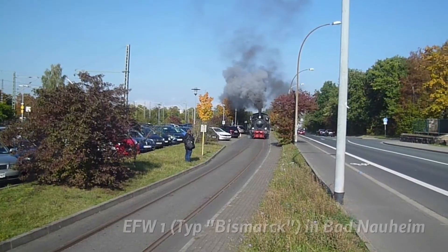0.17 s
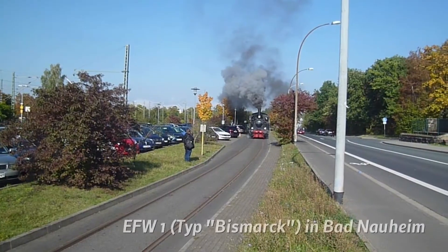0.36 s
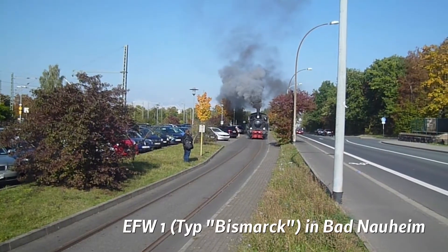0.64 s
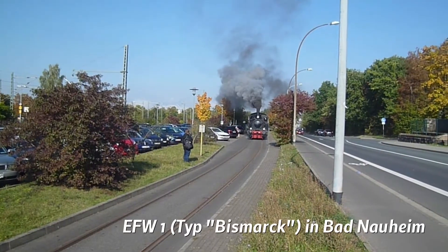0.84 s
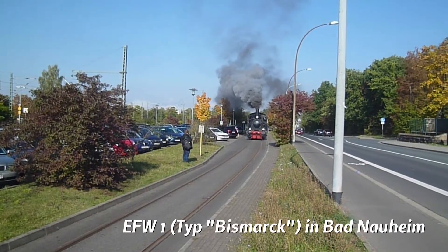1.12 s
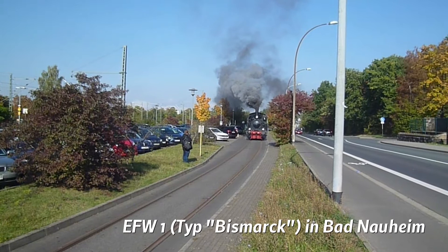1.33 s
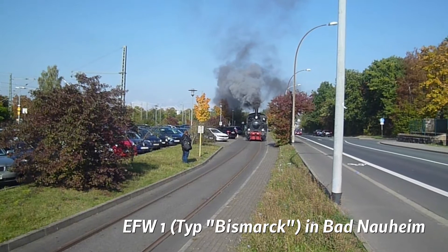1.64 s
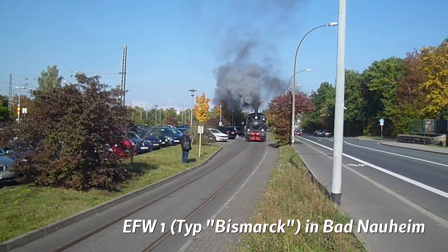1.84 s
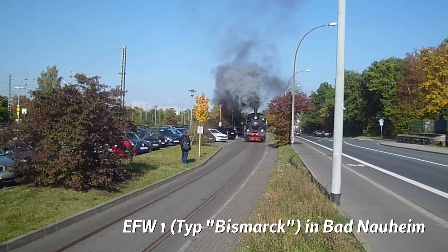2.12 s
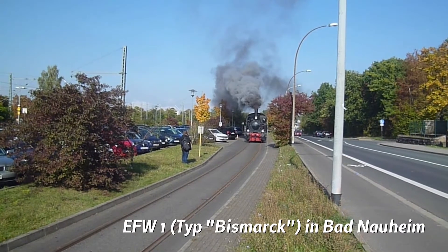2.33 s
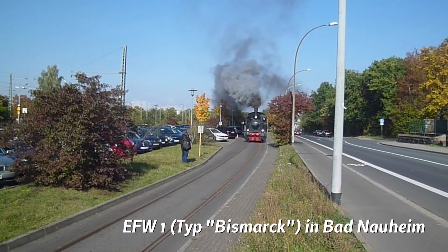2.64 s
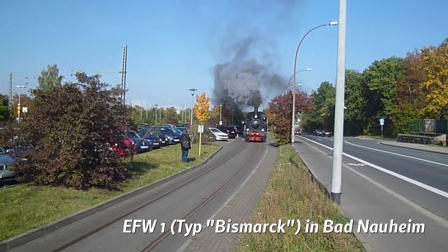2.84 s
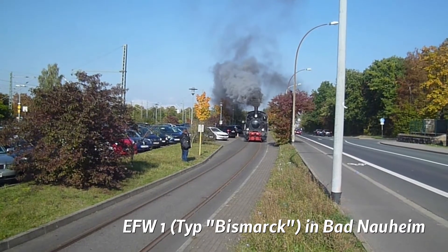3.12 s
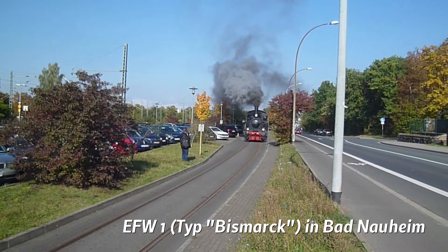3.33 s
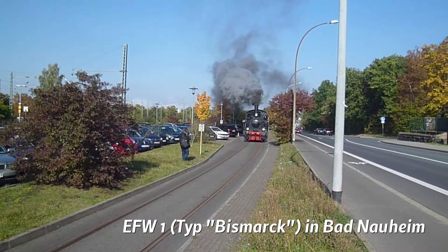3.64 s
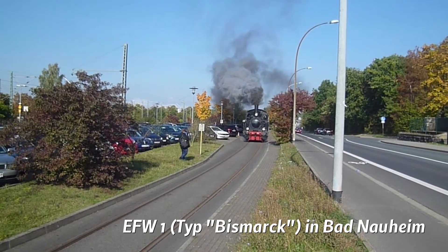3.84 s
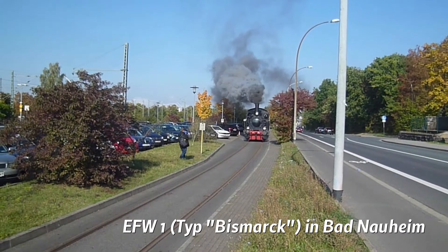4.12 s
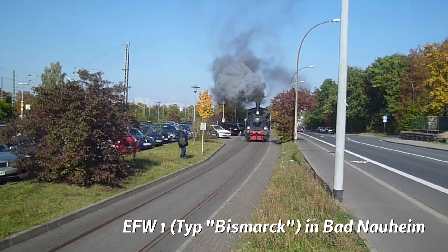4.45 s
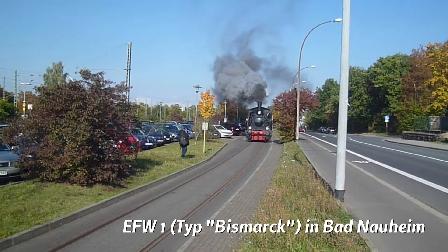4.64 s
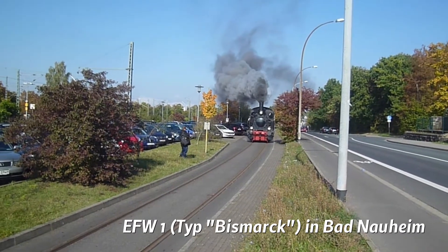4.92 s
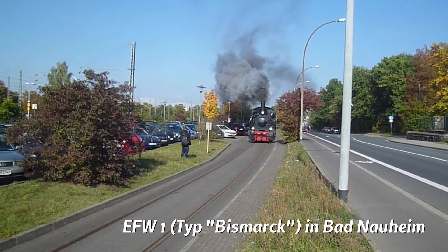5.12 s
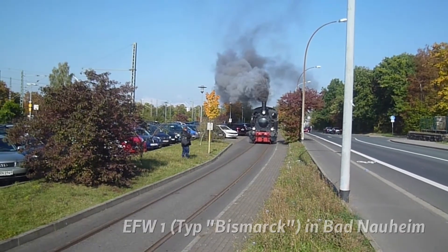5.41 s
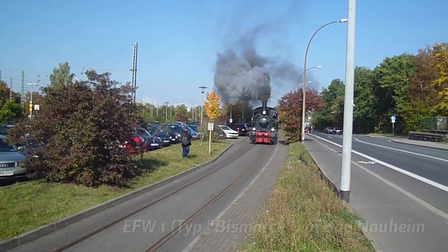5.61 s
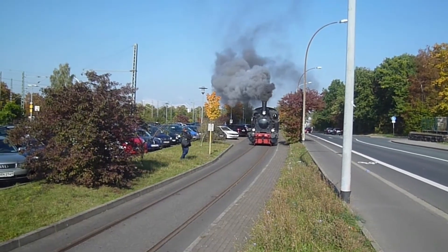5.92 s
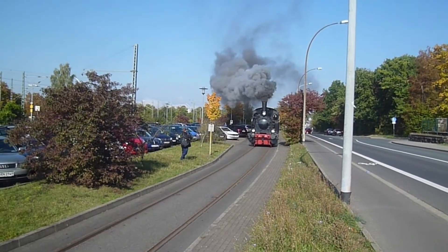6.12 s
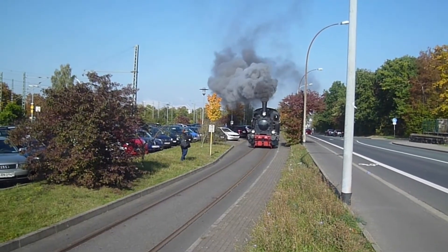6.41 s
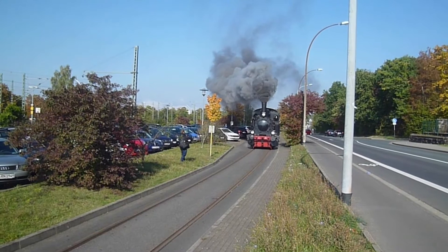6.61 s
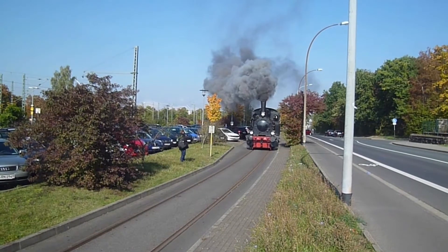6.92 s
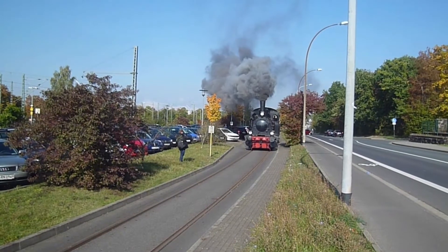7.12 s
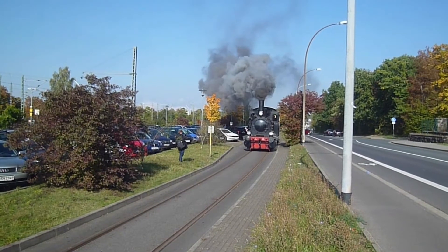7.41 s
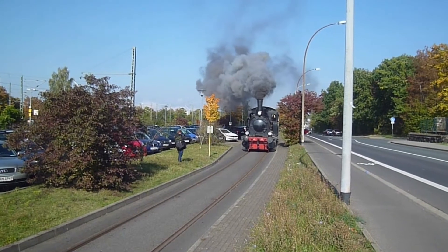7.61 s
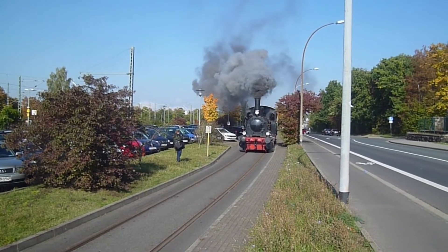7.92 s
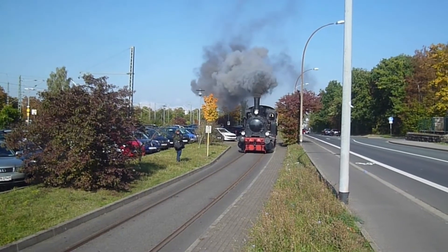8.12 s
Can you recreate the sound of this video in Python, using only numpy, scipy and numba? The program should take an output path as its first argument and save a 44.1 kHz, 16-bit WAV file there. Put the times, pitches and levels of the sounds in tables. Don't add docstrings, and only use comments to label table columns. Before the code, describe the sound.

Open street, mono camera microphone with dull treble and automatic gain. From 0 to 2.7 s a distant steam locomotive approaches with regular chuffs, about four a second: each a short hiss with a hollow chimney ring and a soft lower thump. Low traffic rumble, road noise and faint leaking steam lie beneath. At 2.8 s a brief squeal opens a very loud, nearly pure whistle around 740 Hz, starting slightly flat and rising, with breathy steam and small flutters; the background drops away. At 4.3 s it cuts off, and a strong echo at the same pitch pulses and fades over a second or more while the background climbs back. Chuffs re-emerge at 4.9 s, continuing to 8.3 s and slowly nearing. Wind thumps the microphone, heaviest at 5.5 to 5.8 s; a faint falling chirp comes at 5.7 s. Small metallic clanks sound near 6.9, 7.5 and 7.8 s.

```python
import sys
import numpy as np
from scipy import signal
from scipy.fft import rfft, irfft, next_fast_len
from scipy.io import wavfile
from scipy.ndimage import uniform_filter1d
from numba import njit

SR = 44100
rng = np.random.default_rng(int(sys.argv[2]) if len(sys.argv) > 2 else 0)


def convert_level_to_amplitude(level_db):
    exponent = np.asarray(level_db, float) / 20
    return 10 ** exponent


def transcribe(signal):
    frames = np.atleast_2d(signal).T
    limited = np.clip(frames, -1, 1)
    pcm = np.round(limited * 32767).astype(np.int16)
    wavfile.write(sys.argv[1], SR, pcm)


N = 364266
TIME = np.arange(N) / SR


def rms1(x):
    return x / np.sqrt(np.mean(x ** 2))


@njit
def svf(x, hz, width):
    y, band, low = np.empty(len(x)), 0., 0.
    g, k = np.tan(np.pi * hz / SR), width / hz
    for i in range(len(x)):
        v = (band + g * (x[i] - low)) / (1 + g * (g + k))
        band, low, y[i] = 2 * v - band, low + 2 * g * v, k * v
    return y


def walk(rate_hz):
    knots = rng.standard_normal(2000)
    place = TIME * rate_hz
    step = place.astype(int)
    blend = np.sin(np.pi / 2 * (place - step)) ** 2
    return 1.15 * (knots[step % 2000] * (1 - blend) + knots[(step + 1) % 2000] * blend)


def resonant(modes):
    out = np.zeros(N)
    for hz, width_hz, db in modes:
        once = svf(rng.standard_normal(N), 1. * hz, 1.46 * width_hz)
        out += convert_level_to_amplitude(db) * rms1(svf(once, 1. * hz, 1.46 * width_hz))
    return rms1(out)


def coloured(shape, flicker_db, rate_hz):
    hz, db = np.transpose(shape)
    size = next_fast_len(N, real=True)
    octave = np.log2(np.maximum(np.fft.rfftfreq(size, 1 / SR), 1) / hz[0])
    level = convert_level_to_amplitude(np.interp(octave, np.log2(hz / hz[0]), db, right=-200))
    spectrum = rfft(rng.standard_normal(size)) * level
    out = np.zeros(N)
    for k in range(int(np.log2(hz[-1] / hz[0])) + 2):
        band = irfft(spectrum * np.clip(1 - abs(octave - k), 0, 1), size)[:N]
        out += band * convert_level_to_amplitude(flicker_db * walk(rate_hz))
    return rms1(out)


def puffs(starts, dbs, rise, fall):
    age = np.arange(SR // 2) / SR
    shape = (1 - np.exp(-age / rise)) ** 2 * np.exp(-age / fall)
    kicks = np.zeros(N + SR)
    kicks[((np.asarray(starts) + 1) * SR).astype(int)] = convert_level_to_amplitude(np.asarray(dbs))
    return signal.fftconvolve(kicks, shape / shape.max())[SR:N + SR]


def curve(table):
    return np.interp(TIME, *np.transpose(table))


def bump(at, spread_s):
    return np.exp(-.5 * ((TIME - at) / spread_s) ** 2)


def swells(table, phase, fill):
    s, db = np.transpose(table)
    place = np.interp(TIME, s, np.arange(len(s)))
    size = uniform_filter1d(convert_level_to_amplitude(db[place.astype(int)]) * (TIME < s[-1]), SR // 60)
    return size * (np.sin(np.pi * place) * np.sin(phase) + fill * np.cos(phase))


DUCK_S, RELEASE_S = 2.795, 4.424
DUCK_DB, SINK_DB_S, RECOVER_DB_S = -13.5, -3, 10


def gain_db():
    sunk = DUCK_DB + SINK_DB_S * (np.minimum(TIME, RELEASE_S) - DUCK_S)
    return (TIME >= DUCK_S) * np.minimum(sunk + RECOVER_DB_S * np.maximum(TIME - RELEASE_S, 0), 0)


START_M, SPEED_M_S = 61.2, 2.98


def nearer_db():
    return 20 * np.log10(START_M / (START_M - SPEED_M_S * TIME))


# (time [s], strength [dB], brightness [dB])
CHUFFS = [(-.012, 0, -4), (0.227, 1, 0), (0.475, 2, -0.5), (0.7256, -0.5, 1.5), (0.981, 2.5, 0),
          (1.2284, 1, 0.5), (1.4684, 2, 1), (1.725, 0, -0.5), (1.969, 3, -0.5), (2.2164, 1.5, 0),
          (2.451, 1.5, 0), (2.691, -0.5, -2), (4.8534, -2, -2.5), (5.0804, -1.5, 0), (5.3174, 1, 0.5),
          (5.5434, -0.5, -1.5), (5.7894, 1, 0), (6.0194, 0.5, -1.5), (6.244, -0.5, 0.5),
          (6.4784, -0.5, -2.5), (6.7095, 0.5, -1), (6.94, 0, -1), (7.163, 0, 0.5), (7.39, -1.5, -2),
          (7.6264, 1.5, -1), (7.855, -0.5, -3), (8.0775, 0, 0.5)]
# (centre [Hz], width [Hz], level [dB])
HISS = [(2567, 180, 0.5), (3457, 1100, 3), (4510, 190, -11), (5170, 440, -2), (6300, 1400, -3.5)]
RING = [(1392, 90, -5), (1914, 79, -4), (2060, 90, -4), (1500, 900, -6)]
THUMP = [(589.5, 110, 0.5), (732, 130, -1), (900, 610, -5.5)]
# (time [s], level [dB], decay [s])
CLANKS = [
    (1.648, -41, .02),
    (6.887, -34, 0.055),
    (7.539, -33, .03),
    (7.811, -34.5, 0.035),
]
HISS_DB, RING_DB, THUMP_DB = -41, -39, -39.5


def chuffs():
    s, db, bright_db = np.transpose(CHUFFS)
    s = s - .005
    near_db = nearer_db()
    hiss = puffs(s, HISS_DB + db + bright_db, rise=.012, fall=.031)
    hiss = hiss * convert_level_to_amplitude(2 * walk(200) - .17 * near_db) * resonant(HISS)
    ring = puffs(s, RING_DB + db, rise=.01, fall=.044)
    ring = ring * convert_level_to_amplitude(2 * walk(150) - .34 * near_db) * resonant(RING)
    thump = puffs(s + .004, THUMP_DB + db - bright_db, rise=.018, fall=.049)
    thump = thump * convert_level_to_amplitude(.79 * near_db) * resonant(THUMP)
    beats = convert_level_to_amplitude(.67 * gain_db() + .6 * near_db) * (hiss + ring + thump)
    clank = sum(puffs([at], [level], rise=.0033, fall=decay) for at, level, decay in CLANKS)
    metal = resonant([(770, 140, 5.5), (1985, 350, 0.), (2530, 200, -6.5), (5000, 3000, -10.5)])
    return beats + clank * metal


# (frequency [Hz], density [dB per Hz])
RUMBLE = [(22, -21), (50, -8), (90, -4.5), (120, -0.5), (200, -1.5), (320, -3.5), (380, -14.5),
          (600, -29.5)]
ROAD = [(300, -10), (400, 0), (720, 1), (1100, -5.5), (2000, -8), (2300, -11.5), (2650, -5.5),
        (3100, -19.5)]
STEAM = [(2400, -9.5), (2950, -2), (3300, 1), (3750, -4.5), (5100, -6.5), (5800, -1.5), (6500, -9),
         (8000, -16.5)]
# (time [s], level [dB])
GUST = [(0, -1), (.9, 0), (1.4, 2.5), (2.1, 0), (3.1, 0.5), (3.85, -4), (4.35, 1), (4.7, 6.5), (5.2, 2.5),
        (5.45, 10), (6.1, 0.5), (6.4, 3), (6.75, 2), (7.4, 5), (7.65, 2), (8.26, 5)]
# (frequency [Hz], level [dB])
MOTOR = [(595, -51.5), (1565, -59.5)]
RUMBLE_DB, ROAD_DB, STEAM_DB, ROAD_DUCK = -32.5, -41.5, -51.5, .76


def street():
    gain, near_db = gain_db(), nearer_db()
    rumble = convert_level_to_amplitude(RUMBLE_DB + curve(GUST) + gain) * coloured(RUMBLE, flicker_db=1.8, rate_hz=16)
    road_db = ROAD_DB + ROAD_DUCK * gain + .98 * near_db
    road = convert_level_to_amplitude(road_db) * coloured(ROAD, flicker_db=1.2, rate_hz=14)
    steam_db = STEAM_DB + .7 * gain + 1.38 * near_db
    steam = convert_level_to_amplitude(steam_db) * coloured(STEAM, flicker_db=1.2, rate_hz=21)
    motor = sum(convert_level_to_amplitude(db + 5.4 * walk(6)) * np.sin(2 * np.pi * hz * TIME) for hz, db in MOTOR)
    return rumble + road + steam + convert_level_to_amplitude(gain) * motor


# (time [s], peak [dB], frequency [Hz])
KNOCKS = [(0.029, -21, 135), (4.483, -29, 121), (4.722, -23, 140), (4.788, -31, 231), (4.904, -22, 194),
          (5.142, -25.5, 143), (5.324, -20.5, 135), (5.509, -12, 148), (5.557, -17, 194), (5.608, -29, 223),
          (5.713, -13, 164), (5.828, -10, 196), (5.904, -30, 175), (6.301, -21, 218), (6.385, -20, 143),
          (7.344, -14, 170)]


def wind():
    out, age = np.zeros(N), np.arange(SR // 20) / SR
    for at, db, hz in KNOCKS:
        cycles = (age - .008) * hz * 1.16
        knock = np.exp(-(cycles / .5) ** 2) * np.cos(2 * np.pi * cycles + .84)
        out[int(at * SR):][:len(age)] -= convert_level_to_amplitude(db + .9) * knock
    return out


# (frequency [Hz], peak [dB], time [s], spread [s])
SQUEAL = [
    (1900, -7, 2.7945, .0018),
    (1880, -15, 2.799, .002),
    (800, -20, 2.795, .002),
    (6100, -28, 2.793, .0015),
]
# (time [s], level [dB])
FLOW = [
    (2.8, 0.5),
    (2.93, 6.5),
    (3.05, -1.5),
    (3.15, 7),
    (3.28, 5),
    (3.43, -1),
    (3.56, 3.5),
    (3.8, -4),
    (4.27, -1.5),
]
# (time [s], depth [dB], spread [s])
DIPS = [
    (3.12, -3, 0.0062),
    (3.265, -0.5, .012),
    (3.605, -4.5, .011),
    (3.815, -4, 0.014),
    (4.02, -4, .045),
    (4.17, -2, .025),
    (4.23, -5.5, 0.011),
]
# (null time [s], next swell peak [dB])
SECOND = [
    (2.77, -28.5),
    (3.056, -27.5),
    (3.33, -29),
    (3.674, -34.5),
    (3.97, -31.5),
    (4.45, -31),
]
# (multiple, level [dB])
UPPER = [(4, -48.5), (5, -52), (6, -55)]
# (centre [Hz], width [Hz], level [dB])
BREATH = [(725, 180, 7.5), (860, 51, 3.5), (1250, 290, 4.5), (2034, 150, 8.5), (2760, 480, 1.5),
          (3500, 400, -2.5), (4300, 500, -1.5), (5800, 3700, 0)]
OPEN_S, SHUT_S = 2.792, 4.318
PITCH_HZ, FLAT_HZ, WARM_S, SAG_HZ = 741.8, 24, .5, 2.3
TONE_DB, THIRD_DB, BREATH_DB, JET_DB = -11, -39.5, -39, -50
LIFT = 1
BEND_HZ_PER_DB = 1


def whistle():
    flat_hz = FLAT_HZ * np.exp(-np.maximum(TIME - OPEN_S, 0) / WARM_S)
    hz = PITCH_HZ - flat_hz - SAG_HZ * np.clip((TIME - SHUT_S) / .24 + 1, 0, 1)
    dip_db = sum(db * bump(at, spread) for at, db, spread in DIPS)
    flow_db = curve(FLOW) - LIFT * dip_db
    phase = 2 * np.pi * np.cumsum(hz + 2 * walk(50)) / SR
    bend = -2 * np.pi * np.cumsum(BEND_HZ_PER_DB * dip_db) / SR

    tone = convert_level_to_amplitude(TONE_DB + dip_db + .25 * walk(60)) * np.sin(phase + bend)
    tone = tone + swells(SECOND, 2 * phase, fill=.15) * convert_level_to_amplitude(2 * walk(25))
    tone = tone + convert_level_to_amplitude(THIRD_DB + flow_db + 3.8 * walk(65)) * np.sin(3 * phase + .5 * walk(70))
    for k, db in UPPER:
        level = convert_level_to_amplitude(db + .4 * flow_db + 1 + 3 * walk(60))
        tone = tone + level * np.sin(k * phase + .5 * walk(60))
    valve = np.clip((TIME - OPEN_S) / .0088, 0, 1) * np.clip((SHUT_S - TIME) / .012, 0, 1)

    breath = convert_level_to_amplitude(BREATH_DB + .9 * flow_db + .8 * walk(20)) * resonant(BREATH)
    jet = convert_level_to_amplitude(JET_DB + .9 * flow_db) * coloured(STEAM, flicker_db=1.3, rate_hz=19)
    after = np.clip(TIME - SHUT_S, 0, None)
    air = (np.exp(-after / .25) * breath + np.exp(-after / .082) * jet) * (TIME > DUCK_S)

    squeal = sum(convert_level_to_amplitude(db) * bump(at, spread) * np.sin(2 * np.pi * f * TIME) for f, db, at, spread in SQUEAL)
    chiff = convert_level_to_amplitude(-29) * bump(2.795, .0048) * resonant([(2640, 1530, 1), (4400, 2300, -6.5)])
    return np.sqrt(2) * valve * tone + air + squeal + chiff


# (null time [s], next swell against the even fall [dB])
RETURNS = [(4.319, 0.5), (4.387, -4.5), (4.442, 2.5), (4.539, 2), (4.649, -1), (4.714, 1), (4.787, 2.5),
           (4.898, -6), (4.947, -1), (5.022, 0.5), (5.099, -2), (5.203, 4.5), (5.278, 0), (5.356, 1),
           (5.426, -0.5), (5.509, 4.5), (5.615, -1), (5.7, 0)]
# (multiple, level at blast end [dB], t60 [s])
ECHO_UPPER = [(2, -41.5, 4.4), (3, -36.5, 2.8), (4, -51, 2.7), (5, -54, 2.2), (6, -60, 1.8)]
ECHO_HZ, ECHO_DB, ECHO_FALL_DB_S = 736, -.5, 22.5
FAR_S, FAR_DB, FAR_WIDTH_HZ = 2.16, -39, 23


def echo():
    age = TIME - SHUT_S
    gain = gain_db()
    fall = convert_level_to_amplitude(ECHO_DB - ECHO_FALL_DB_S * np.maximum(age, 0) + gain)
    phase = 2 * np.pi * np.cumsum(ECHO_HZ + 3 * walk(20)) / SR
    first = fall * swells(RETURNS, phase, fill=.38) * convert_level_to_amplitude(1.5 * walk(25))
    first = first * np.clip(age / .01 + 1, 0, 1)
    blur = fall * convert_level_to_amplitude(-16) * resonant([(720, 32, 0)])
    far = convert_level_to_amplitude(FAR_DB + .6 * gain) * resonant([(ECHO_HZ, FAR_WIDTH_HZ, 0)])
    far = far * np.clip((TIME - OPEN_S - FAR_S) / .28, 0, 1) * np.clip((FAR_S - age) / .03, 0, 1)
    upper = sum(convert_level_to_amplitude(db - 60 * age / t60) * resonant([(k * 738., 20., 0)]) for k, db, t60 in ECHO_UPPER)
    return first + far + (blur + upper) * np.clip(age / .012 + 1, 0, 1)


# (start [s], end [s], from [Hz], to [Hz], level [dB])
BIRD = (5.685, 5.79, 2690, 2470, -47)


def bird():
    start, end, from_hz, to_hz, db = BIRD
    done = np.clip((TIME - start) / (end - start), 0, 1)
    phase = 2 * np.pi * np.cumsum(from_hz + (to_hz - from_hz) * done) / SR
    return convert_level_to_amplitude(db) * np.sin(np.pi * done ** .65) * np.sin(phase)


def scene():
    return (chuffs() + street() + wind() + whistle() + echo() + bird())[None]


def low_pass(x):
    return signal.sosfilt(signal.butter(12, 11700, fs=SR, output="sos"), x)


TOP_HZ, CAMERA_HZ, OFFSET = 7580, 15600, .0249


def record(dry):
    cut = signal.sosfilt(signal.ellip(9, .5, 60, TOP_HZ, fs=SR, output="sos"), dry)
    mirror = convert_level_to_amplitude(-32) * svf(cut[0] * np.cos(2 * np.pi * CAMERA_HZ * TIME), 9800., 3000.)
    return low_pass(cut + mirror + OFFSET)


dry = scene()
out = record(dry)
transcribe(out)
```